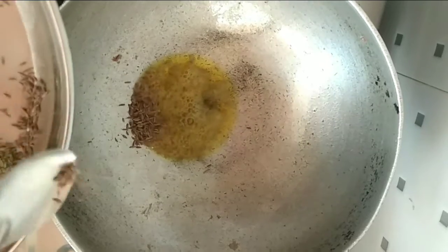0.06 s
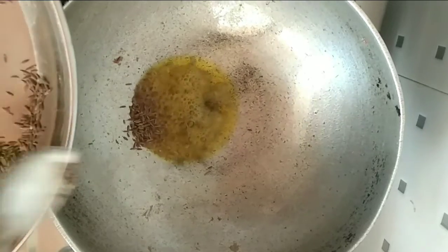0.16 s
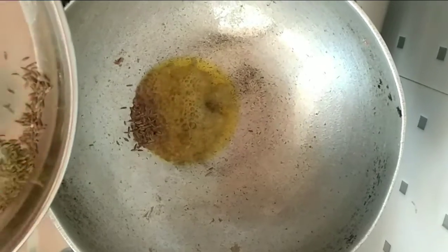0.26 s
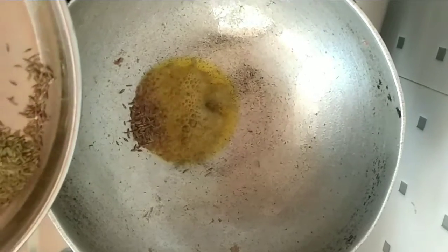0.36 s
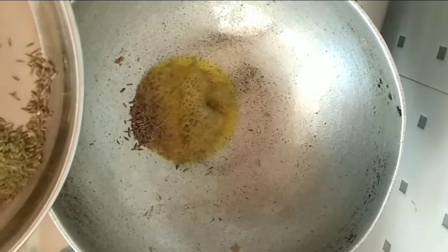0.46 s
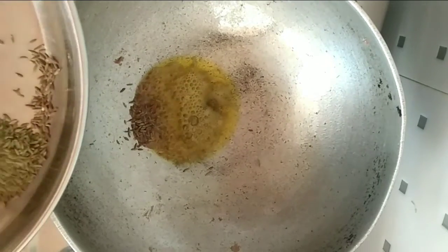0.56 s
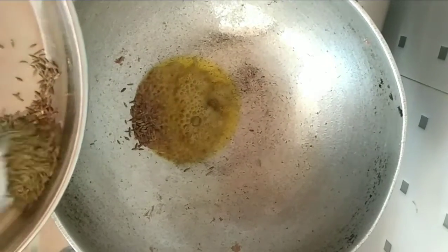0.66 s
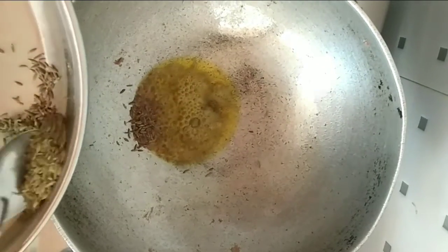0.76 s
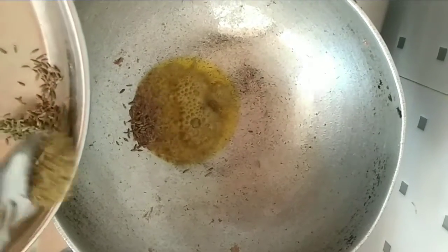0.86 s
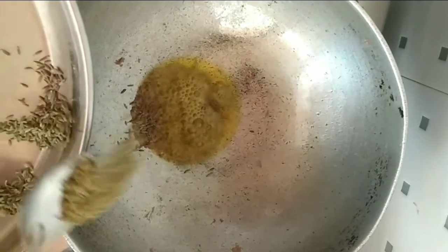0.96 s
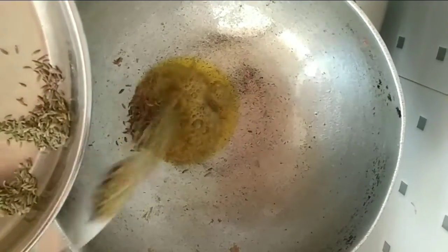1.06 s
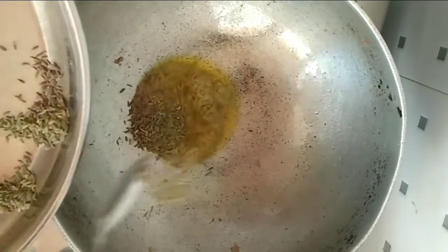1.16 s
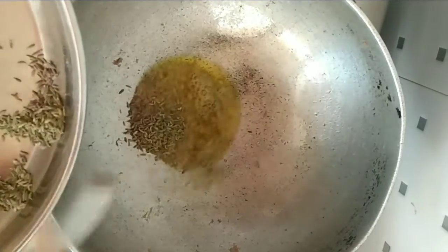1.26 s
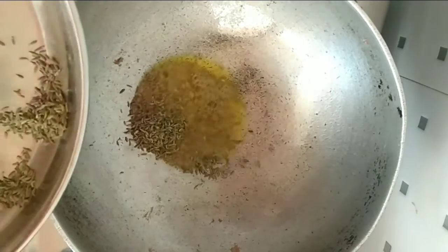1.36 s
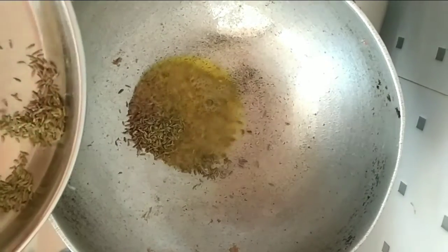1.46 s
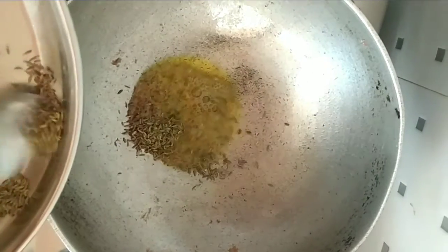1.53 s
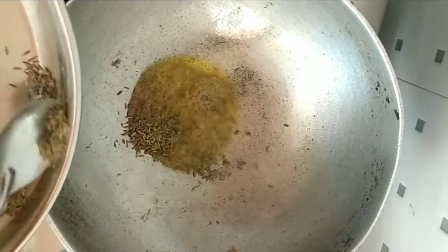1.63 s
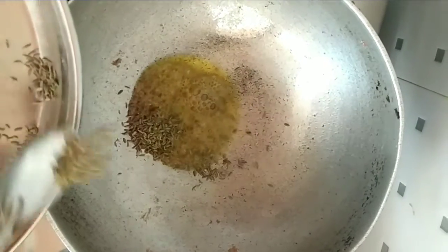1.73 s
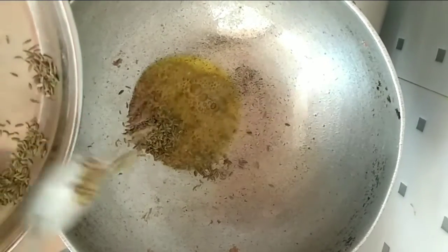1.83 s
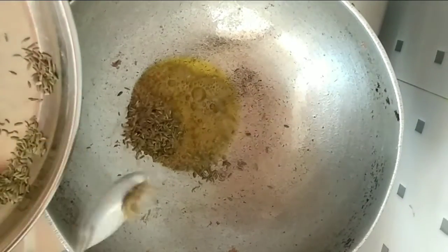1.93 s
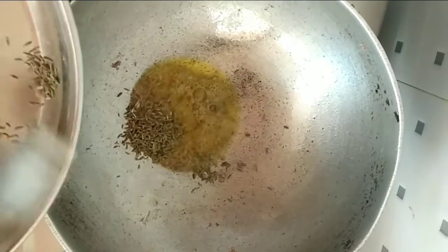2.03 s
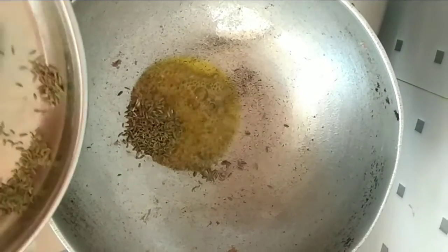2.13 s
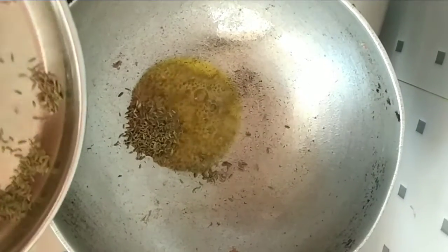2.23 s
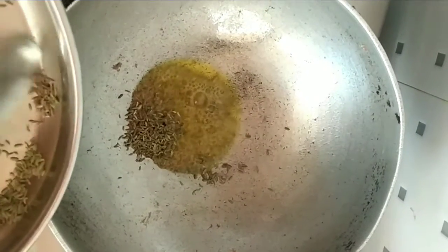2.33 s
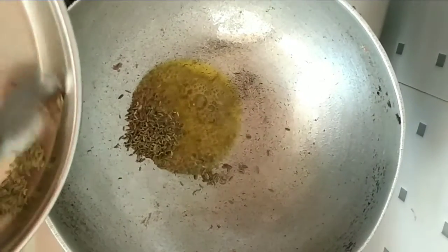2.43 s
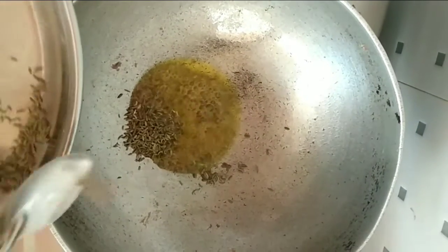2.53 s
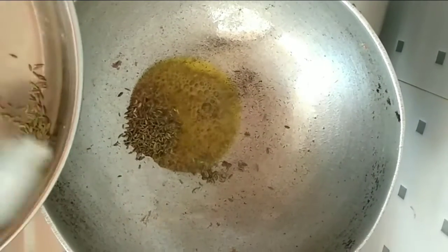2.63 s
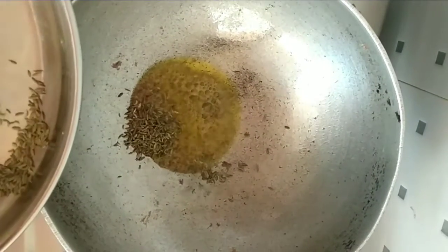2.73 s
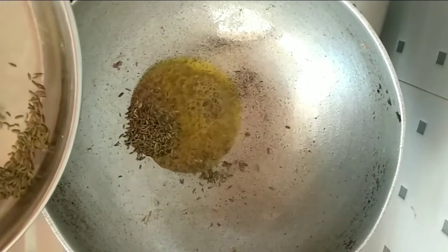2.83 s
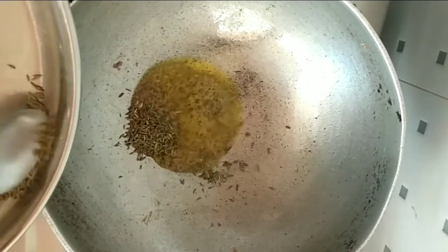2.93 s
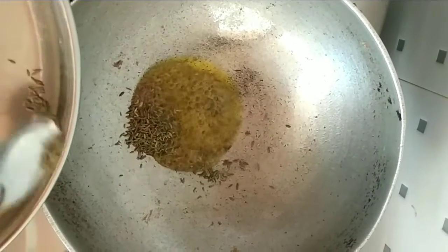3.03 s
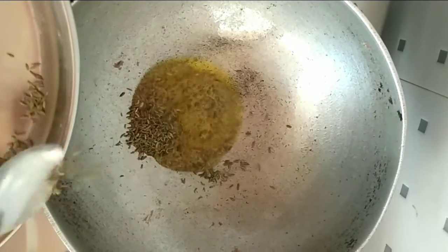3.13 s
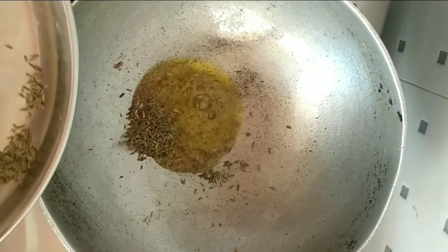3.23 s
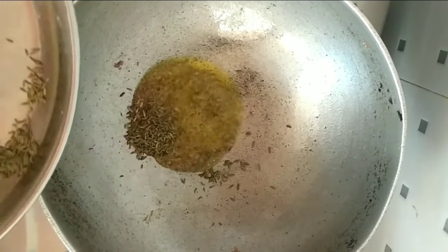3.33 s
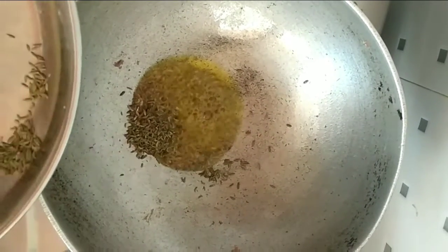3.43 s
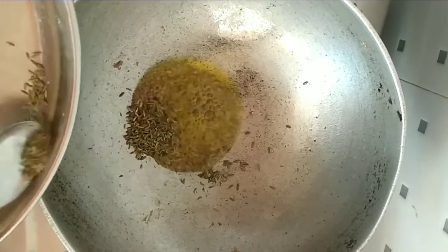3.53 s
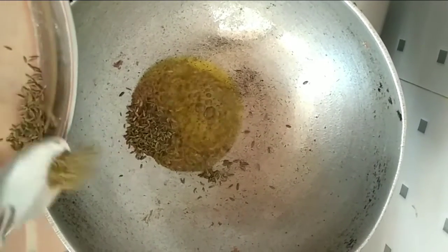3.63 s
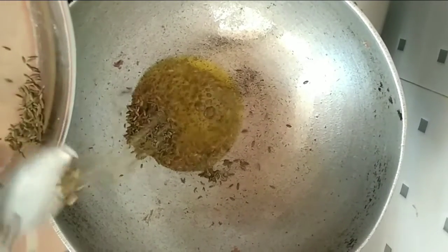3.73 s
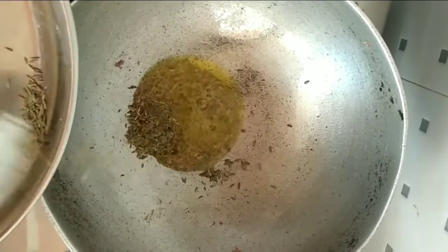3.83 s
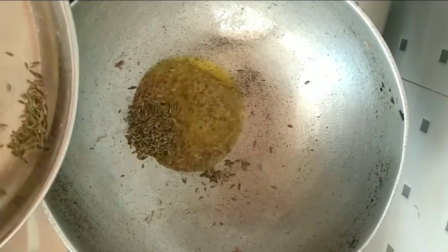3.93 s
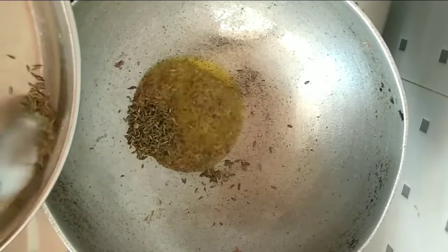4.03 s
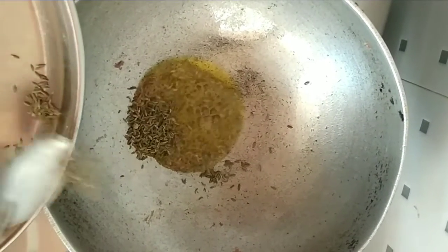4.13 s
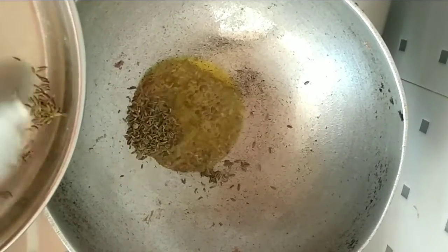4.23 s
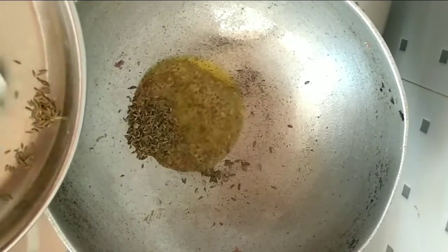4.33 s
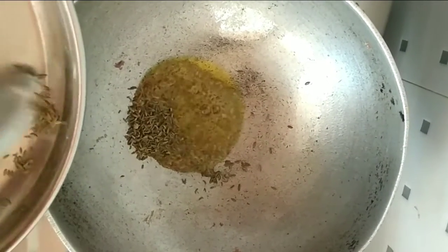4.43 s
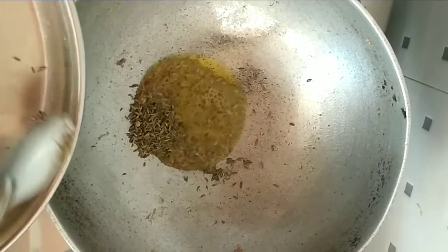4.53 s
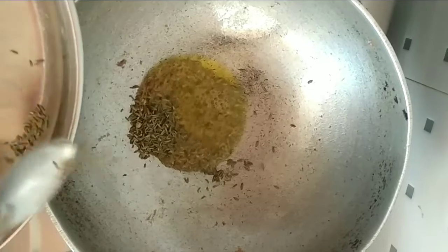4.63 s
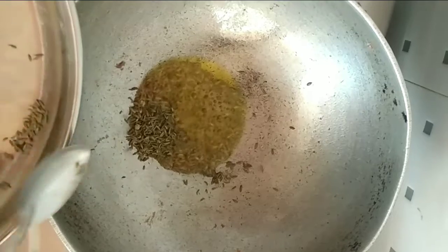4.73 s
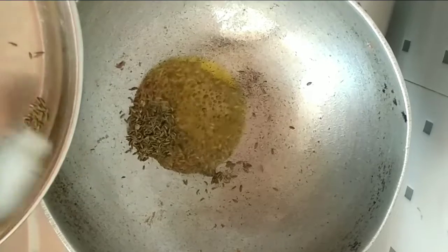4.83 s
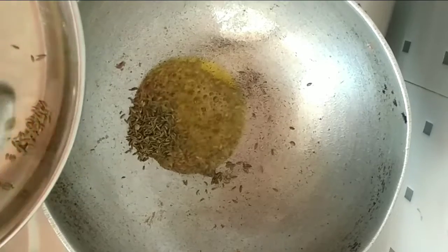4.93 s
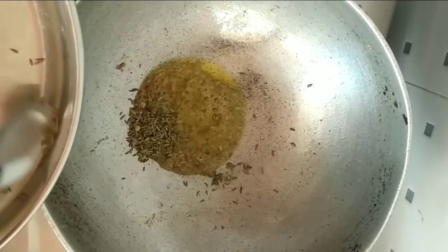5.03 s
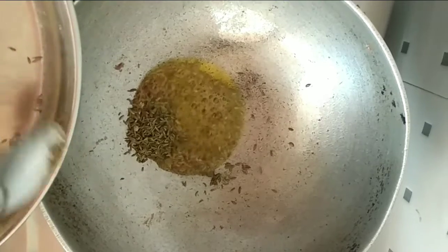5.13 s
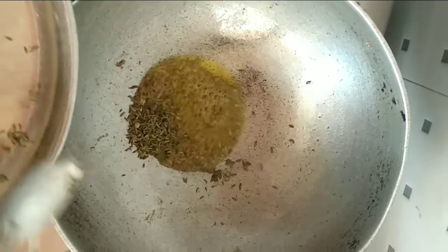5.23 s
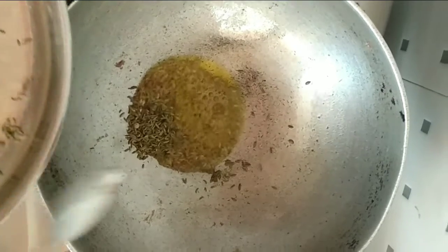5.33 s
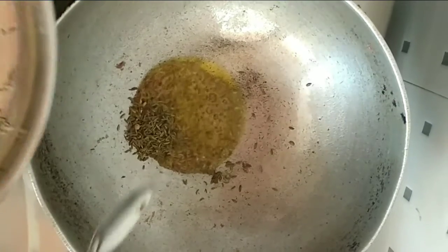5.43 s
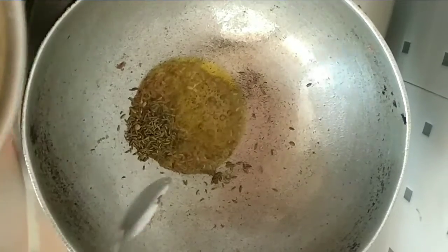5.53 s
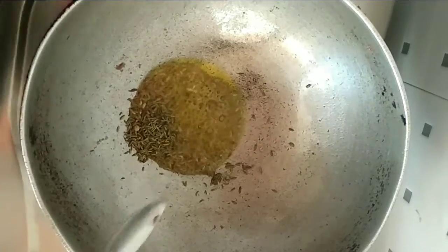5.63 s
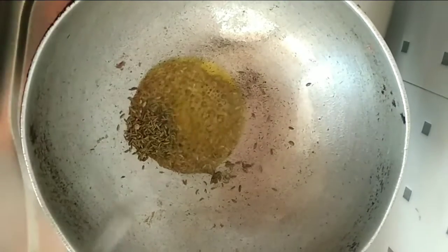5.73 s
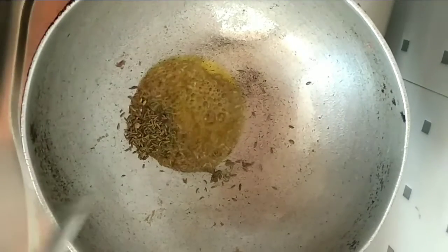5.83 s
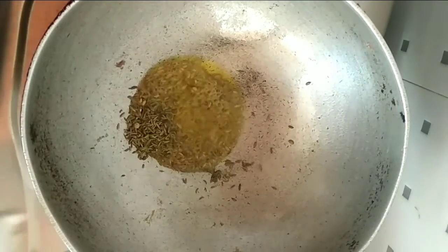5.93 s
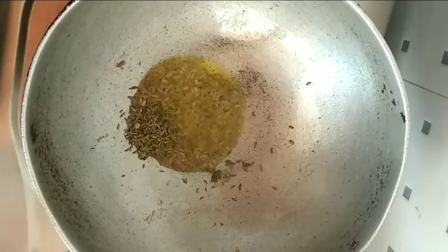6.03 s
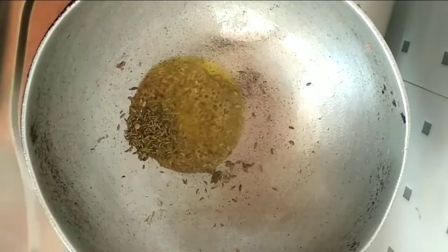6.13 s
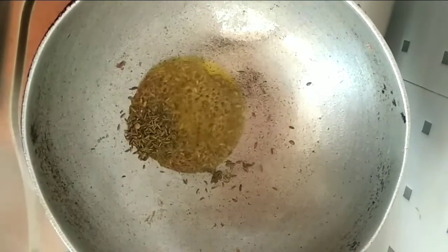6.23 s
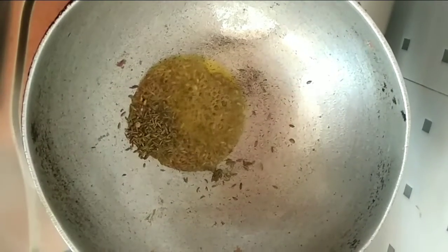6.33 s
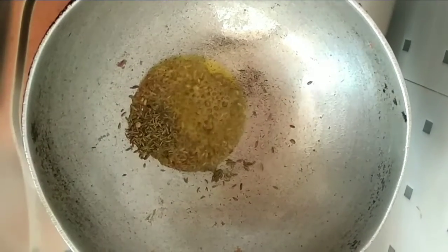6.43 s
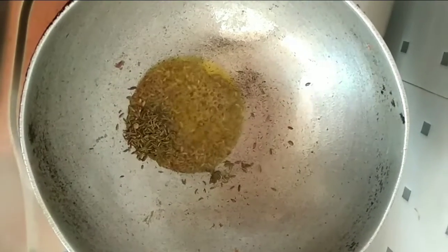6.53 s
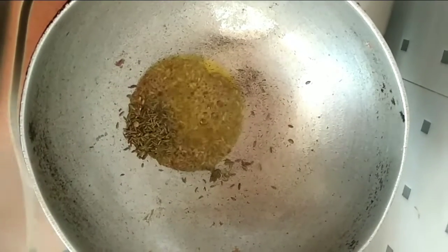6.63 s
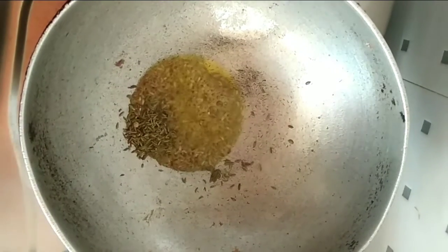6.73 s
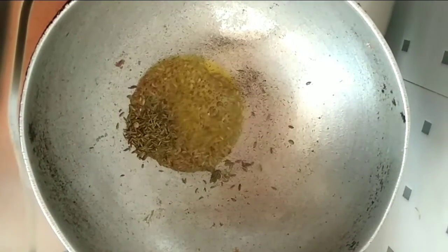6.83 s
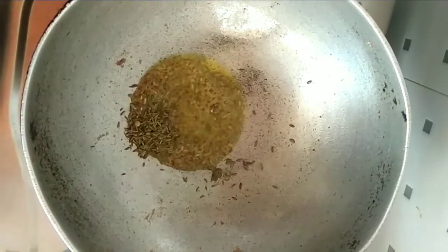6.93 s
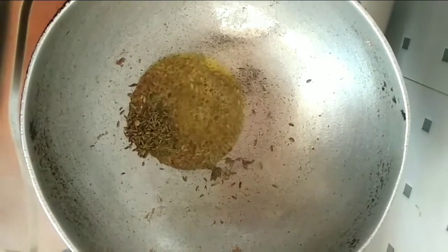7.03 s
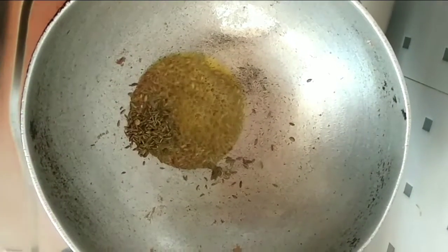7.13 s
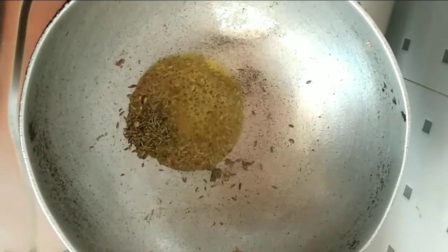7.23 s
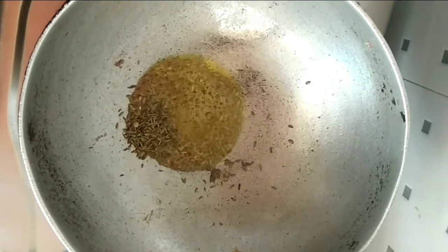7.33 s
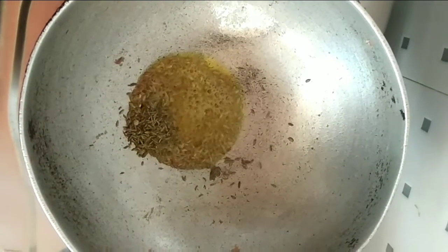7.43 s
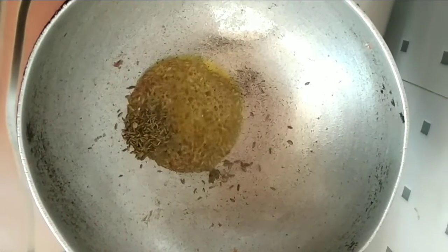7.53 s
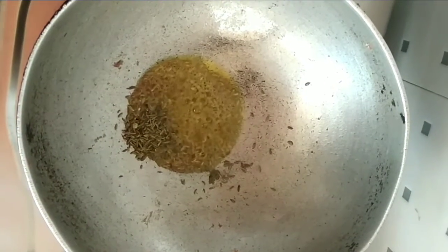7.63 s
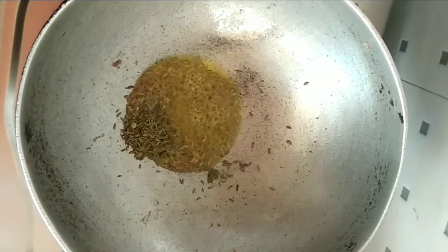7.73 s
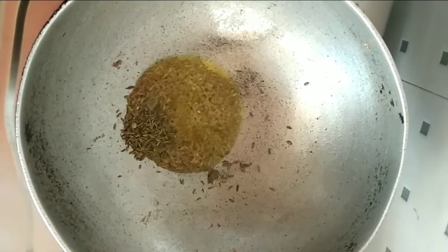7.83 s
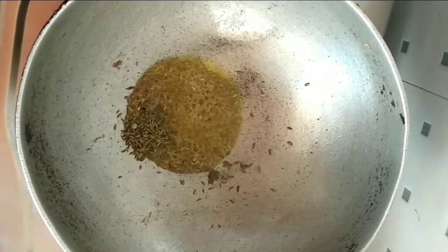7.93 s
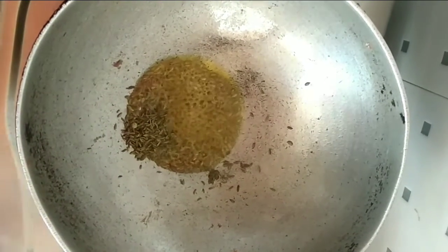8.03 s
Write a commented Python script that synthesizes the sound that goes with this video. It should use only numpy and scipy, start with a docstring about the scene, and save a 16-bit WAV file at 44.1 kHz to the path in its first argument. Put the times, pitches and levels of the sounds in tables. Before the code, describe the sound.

Close up in a small tiled kitchen, a steady fine fizz of hot oil runs throughout. A spoon clinks and rasps brightly on a steel plate, mostly to the left, and dry seeds slide and patter into a steel pan. Sparse pops turn into a dense, loud crackle from about three to six seconds, then only soft fizz and a few last scrapes remain.

```python
"""Seeds scraped into hot oil

Spoonfuls of seeds are scraped from a steel plate into a steel pan of hot oil, just below a phone.
Sliding seeds and fizz are tiny clicks and noise; each pop is a click, a short noise crack and spatter.
Scrapes and knocks of the spoon ring the modes of the plate; a kitchen hums and rings around it."""
import sys
import numpy as np
from scipy import signal
from scipy.fft import rfft, irfft, next_fast_len
from scipy.io import wavfile
from scipy.ndimage import uniform_filter1d

SR = 44100
rng = np.random.default_rng(int(sys.argv[2]) if len(sys.argv) > 2 else 0)


def generate_wav(sig):
    """Save sig (samples, or channels by samples) to the path in sys.argv[1] as 16-bit PCM at SR."""
    pcm = np.round(np.clip(np.atleast_2d(sig).T, -1, 1) * 32767).astype(np.int16)
    wavfile.write(sys.argv[1], SR, pcm)


N = 355446

# the spoon drags over the plate: (start_s, length_s, rasp_db, shoved_seeds_db,
# swell_db along the stroke, pitch_factor of the modes)
STROKES = [(0.362, 0.0086, -35.5, -44, 1, 1.0), (0.418, 0.014, -38.5, -56.5, 0.5, 0.99),
           (0.446, 0.041, -55, -49.5, -0.5, 1.0), (0.511, 0.088, -39.5, -43.5, 1.5, 1.0),
           (0.628, 0.058, -46, -52.5, 1, 1.0), (1.416, 0.11, -34, -54, 0.5, 1),
           (1.43, 0.008, -37, -44, 0, 1.0), (1.475, 0.0078, -30.5, -64, -2, 0.99),
           (1.526, 0.0077, -35, -67, 2, 1.0), (2.124, 0.1, -41.5, -55, 0.5, 0.99),
           (2.289, 0.067, -46.5, -55, -7, 1.0), (2.4, 0.028, -45, -60, 0.5, 1.0),
           (2.4205, 0.014, -29, -46, -4, 0.95), (2.733, 0.0055, -34.5, -48, -2, 0.92),
           (2.735, 0.095, -35, -48.5, 5, 0.995), (3.268, 0.112, -35, -47, -4.5, 1.0),
           (3.86, 0.12, -33.5, -57.5, 0, 1.0), (4.249, 0.13, -31.5, -66, 0.5, 1.0),
           (4.871, 0.0059, -30, -52, -1.5, 0.96), (4.872, 0.094, -32, -40.5, -2, 1),
           (4.98, 0.0683, -47, -43.5, -0.5, 0.97), (5.042, 0.0097, -37.5, -46, 1.5, 0.93),
           (6.614, 0.046, -53.5, -47, 0, 0.98), (6.742, 0.015, -44, -52.5, 0, 0.99),
           (6.943, 0.016, -36, -42, 1.5, 0.98)]


def undb(db):
    """Gain of a level in dB."""
    return 10 ** (np.asarray(db) / 20)


def level(x, db):
    """Scale to an rms level."""
    return x * undb(db) / np.sqrt(np.mean(x ** 2))


def sides(db):
    """Left and right gains that differ by db, left louder when positive."""
    return undb(np.array([[db], [-db]]) / 2)


def colour(x, table):
    """Give x the spectrum of (Hz, dB) points."""
    hz, db = np.transpose(table)
    size = next_fast_len(N)
    bins = np.arange(1, size // 2 + 2) * SR / size
    gain = undb(np.interp(np.log(bins), np.log(hz), db, -120, -120))
    return irfft(rfft(x, size) * gain, size)[..., :N]


def band(x, hz, width):
    """One resonance, gain 1 at its centre."""
    return signal.lfilter(*signal.iirpeak(min(hz, .4 * SR), hz / width, SR), x)


def highpass(x, order, hz):
    """Keep what lies above hz."""
    return signal.lfilter(*signal.butter(order, hz, "high", fs=SR), x)


def walk(rate):
    """Random levels held 1 / rate s and slewed; spread near 1."""
    k = int(SR / rate)
    held = np.repeat(rng.standard_normal(N // k + 1), k)
    return 1.3 * uniform_filter1d(uniform_filter1d(held, k), k)[:N]


def grains(rate, spread_db, hiss):
    """Tiny clicks of uneven size over a share of even hiss; rms 1."""
    size = undb(spread_db * np.minimum(rng.exponential(size=N), 4.5))
    clicks = (rng.random(N) < rate / SR) * rng.standard_normal(N) * size
    return level(level(clicks, 0) + hiss * rng.standard_normal(N), 0)


def chirps(rate, spread_db, cycles):
    """Sparse grains, each ringing a few cycles at 40 pitches and moments; rms 1."""
    clicks = grains(rate=rate, spread_db=spread_db, hiss=0)
    pitches = 1500 * 2 ** ((np.arange(40) + rng.random(40)) / 12)
    shifts = rng.integers(0, N, 40)
    rings = (band(np.roll(clicks, k), f, f / cycles) * np.sqrt(cycles) for f, k in zip(pitches, shifts))
    return level(sum(rings), 0)


def patchy(x, spread_db, rate):
    """Let each half octave swell and sink by itself."""
    centres = 500 * 2 ** np.arange(0, 5.1, .5)
    return sum(undb(spread_db * walk(rate)) * band(x, f, f / 3) for f in centres)


def pair(x, other, share):
    """Left and right that have x in common and differ by a share of another sound."""
    return (x + share * other * np.array([[1], [-1]])) / np.sqrt(1 + share ** 2)


def add(out, s, sound, pan_db):
    """Place a short sound between the two microphones."""
    i = int(s * SR)
    n = min(sound.shape[-1], N - i)
    out[:, i:i + n] += sound[..., :n] * sides(pan_db)


def peak(t, start, length, db, rise_db_s, fall_db_s, swell_db=0):
    """Gain that climbs in dB to start, holds or swells for length, then sinks."""
    along = np.clip((t - start) / max(length, .001), 0, 1)
    rise = rise_db_s * np.maximum(start - t, 0)
    fall = fall_db_s * np.maximum(t - start - length, 0)
    return undb(db + swell_db * along - rise - fall)


def stroke_gain(t, start, length, db, swell_db):
    """Loudness of one spoon stroke: it climbs and sinks at fixed speeds in dB per second."""
    return peak(t, start, length, db, 2500, 904.5, swell_db)


def coarse_time():
    """Seconds at every 32nd sample, enough for slow gains."""
    return np.arange(0, N, 32) / SR


def every_sample(gain):
    """Fill in a gain given on the coarse times."""
    return np.interp(np.arange(N) / SR, coarse_time(), gain)


def hum():
    """Low kitchen rumble, nearly alike at both microphones."""
    # spectrum of the rumble, before the overall level: (pitch_hz, relative level_db per Hz)
    rumble = [(8.8, -33), (15, -1), (24, -1), (31, -4), (50, 1.5), (60, -3), (70, -17.5), (91, -1.5),
              (154, -13), (265, -23), (350, -22), (421, -33), (600, -34), (780, -64.5), (1320, -120)]
    mid, side = colour(rng.standard_normal((2, N)), rumble)
    return level(mid + 0.2 * side * np.array([[1], [-1]]), -69) * undb(1.7 * walk(4.06))


def hums():
    """A wavering tone, a sine with narrow noise, under a smooth swell."""
    # short soft hums: (middle_s, level_db, pitch_hz, half_length_s, left_minus_right_db)
    soft_hums = [(2.886, -61, 410, 0.0233, 15), (5.583, -63, 237, 0.034, -0.5),
                 (6.902, -56, 532, 0.05, 10.5), (6.994, -66, 530, 0.035, 4), (7.001, -73, 792, 0.036, -13)]
    out = np.zeros((2, N))
    for (s, db, hz, half, pan_db), air in zip(soft_hums, rng.standard_normal((len(soft_hums), SR // 2))):
        t = np.arange(-2 * half, 2 * half, 1 / SR)
        waver = level(band(air, hz, 52.0), -10.5)[-len(t):]
        tone = np.sin(2 * np.pi * hz * t) + waver
        add(out, s + t[0], undb(db) * np.exp(-2 * (t / half) ** 2) * tone, pan_db)
    return out


def puffs():
    """One push of air against the microphones, a weaker pull after it."""
    # single puffs: (crest_s, peak_db, speed_hz that sets how short the puff is, left_minus_right_db)
    air_puffs = [(3.1663, -32.5, 133, -24.5), (3.5831, -36.5, 300, -15), (4.714, -23, 230, -5)]
    out, t = np.zeros((2, N)), np.arange(-441, 1323) / SR
    for s, db, hz, pan_db in air_puffs:
        push = np.exp(-(10.7 * hz * t) ** 2)
        pull = 0.146 * np.exp(-(2.0 * (hz * t - .45)) ** 2)
        add(out, s + t[0], undb(db) * (push - pull), pan_db)
    return out


def fizz():
    """Fine steam bubbles all over the oil, unrelated left and right."""
    # how hard the oil fizzes: (time_s, level_db)
    heat = [(0.0, -46.5), (2.5, -46), (3.4, -47), (4.2, -47.5), (5.3, -46.5), (8.06, -49)]
    # spectrum of the bubbles: (pitch_hz, relative level_db per Hz)
    bubble_spectrum = [(400, -40), (520, -21.5), (1000, -26), (1320, -17.5), (1740, -24), (2100, -11),
                       (3250, -6), (4300, -10), (7300, -2.5), (12000, -2.5), (15600, 2)]
    heat_db = np.interp(np.arange(N) / SR, *np.transpose(heat))
    both = []
    for side_db in (0.5, -0.5):
        clicks = grains(rate=3000, spread_db=2.0, hiss=1.5)
        clicks = clicks + 0.7 * chirps(rate=110, spread_db=1.4, cycles=50.0)
        both.append(level(patchy(colour(clicks, bubble_spectrum), 2.0, 55), side_db))
    return np.array(both) * undb(heat_db)


def room(x):
    """The pan bowl and tiled walls answer with a dense tail, duller than the direct sound."""
    t60_s, tail_db, thin_hz, dull_hz = 0.4, -10, 392, 7700
    t = np.arange(SR // 2) / SR
    tail = rng.standard_normal((2, len(t))) * undb(-60 * t / t60_s) * (t > .0015)
    tail = signal.lfilter(*signal.butter(1, [thin_hz, dull_hz], "band", fs=SR), tail)
    tail = tail / np.sqrt(np.sum(tail ** 2, axis=1, keepdims=True))
    return undb(tail_db) * signal.fftconvolve(x, tail, axes=1)[:, :N]


def pops():
    """A crack of about a millisecond with a duller body, then droplets spatter all over the pan."""
    # bursting seeds and spits of oil: (time_s, peak_db of the crack, centre_hz,
    # body_db and spatter_db against the crack)
    bursts = [(0.367, -27, 12000, -8.5, -15.5), (0.4208, -31, 10500, -12.5, -10.5),
              (0.741, -43, 2400, -7, -25), (0.878, -44, 11000, -34, -26), (1.2504, -23, 7100, -51, -15.5),
              (1.5139, -22, 11900, -41, -21), (1.5754, -38, 3360, -22, -21),
              (1.6137, -28.5, 11000, -31, -16), (1.6254, -27.5, 9000, -28.5, -21),
              (2.0637, -29.5, 9600, -36.5, -13), (2.125, -13, 10240, -7.5, -29),
              (2.284, -33.5, 11200, -32, -7.5), (2.3295, -36, 5000, -11.5, -23),
              (2.34, -32.5, 4430, -29, -7.5), (2.7319, -25, 12300, -7.5, -17),
              (3.1087, -7.5, 7360, -16, -20.5), (3.173, -7, 13000, -13, -24),
              (3.2372, -22.5, 13500, -29, -12), (3.2627, -11.5, 10300, -12, -22.5),
              (3.3893, -22, 9050, -22, -31), (3.462, -19, 5460, -9, -11.5), (3.559, -15, 4600, -11, -20.5),
              (3.5909, -7.5, 9800, -16.5, -15.5), (3.6495, -11, 5700, -57.5, -17.5),
              (3.8166, -9.5, 6500, -13.5, -21.5), (3.829, -26, 7000, -15, -18),
              (3.8595, -11.5, 11400, -9, -18.5), (3.9076, -32, 2780, -1, -14),
              (3.915, -25, 11500, -30.5, -15), (3.966, -27, 3000, -5, -13), (3.993, -10.5, 7250, -17, -18),
              (3.998, -17, 12000, -27, -10), (4.015, -21, 6300, -24, -12), (4.2, -29, 7600, -15, -10),
              (4.238, -22, 8700, -30, -14), (4.2513, -8, 12100, -15.5, -22.5), (4.446, -27, 11000, -4, -19),
              (4.468, -31.5, 7000, -1.5, -29), (4.561, -31, 12300, -14, -11.5),
              (4.6896, -21, 7180, -12.5, -20), (4.7214, -7.5, 10200, -14, -15),
              (4.784, -12, 6340, -12.5, -16.5), (4.7864, -8, 5950, -12, -32), (4.789, -17, 6840, -11, -33),
              (4.791, -14, 5540, -21, -36), (4.793, -9.5, 13500, -31.5, -20),
              (4.868, -14.5, 11000, -10.5, -16), (5.1789, -23, 7500, -11, -12.5),
              (5.318, -25.5, 9400, -20.5, -8.5), (5.331, -26, 6960, -24, -26),
              (5.35, -34, 11500, -19, -21.5), (5.6149, -21.5, 12200, -48, -16.5),
              (5.713, -23.5, 6900, -16.5, -12), (5.7243, -18, 6400, -21, -22),
              (5.7801, -3.5, 10470, -21, -16.5), (5.908, -10, 11800, -20.5, -18),
              (6.073, -27.5, 10300, -21.5, -16), (6.501, -24, 6300, -0.5, -25),
              (6.617, -31, 10900, -21, -9.5), (6.67, -33.5, 11700, -20.5, -8), (6.747, -32, 10900, -6, -13),
              (6.949, -41, 11500, -22, -3), (6.961, -39.5, 9000, -7, -6.5)]
    pan_db, pan_scatter_db, body_pitch_scatter = 1.5, 1.5, 0.13
    snap_db, snap_low_hz = -3, 900  # the first instant is one broad click
    spatter_body_db, spatter_t60_s = 5.5, 0.12
    echo_s, echo_db = 0.0043, -11  # back from the far wall of the pan, and again
    out, t = np.zeros((2, N)), np.arange(SR // 3) / SR
    click = highpass(1. * (np.arange(len(t)) == 8), 2, snap_low_hz)
    places = rng.standard_normal((len(bursts), 2))
    airs = rng.standard_normal((len(bursts), 4, len(t)))
    for (s, db, hz, body_db, spatter_db), place, air in zip(bursts, places, airs):
        where_db = pan_db + pan_scatter_db * place[0]
        pitch = 1 + body_pitch_scatter * place[1]  # each pop has its own body pitch
        bright = band(band(air[:2], hz, 0.63 * hz), hz, 1.33 * hz)
        bright = level(highpass(bright, 2, 1800.), 0)
        dull = band(band(air[2:], 2289.0 * pitch, 1440.0), 2207.0 * pitch, 3077.0)
        dull = level(dull + 0.29 * band(air[2:], 1150.0 * pitch, 580.0), 0)

        snap = band(click, hz, 1.3 * hz)
        crack = pair(*bright, 1.0) * (1 - np.exp(-t / 0.00013)) * np.exp(-t / 0.0008)
        body = pair(*dull, 0.55) * t * np.exp(-t / 0.00094)
        burst = undb(snap_db) * snap / np.abs(snap).max() + crack / np.abs(crack).max()
        burst = burst + undb(body_db) * body / np.abs(body).max()

        drops = undb(5.6 * uniform_filter1d(air[0, ::-1], 60))  # uneven loudness
        fade = undb(spatter_db - 60 * t / spatter_t60_s) * (1 - np.exp(-t / 0.0012))
        spatter = drops * (bright + undb(body_db + spatter_body_db) * dull) * fade
        add(out, s, undb(db) * (burst + spatter), where_db)
        for turn in (1, 2):  # echoes with left and right swapped
            add(out, s + turn * echo_s, undb(db + turn * echo_db) * burst[::-1], where_db)
    return out


def knocks():
    """A blow and its rebound ring the plate modes near their own pitch; a dying rattle keeps them shaking."""
    # the spoon bumps the plate: (time_s, blow_peak_db, rebound_db against the blow, rattle_db,
    # centre_hz, focus_db lost an octave away, rattle_t60_s)
    bumps = [(0.293, -68.5, -19, -70, 1020, 30.5, 0.26), (0.344, -58, -20, -53.5, 738, 3, 0.26),
             (0.359, -31.5, -12, -41, 696, 19, 0.17), (0.367, -38, -14, -52, 1000, 6, 0.08),
             (0.379, -37.5, -9, -52, 720, 6, 0.2), (0.431, -30, -17, -45.5, 490, 31, 0.35),
             (0.445, -40, -18, -47, 622, 32, 0.12), (0.4623, -47, -13, -47, 563, 8.5, 0.115),
             (0.475, -32, -16, -44, 690, 18, 0.12), (0.516, -50, -7, -58, 450, 16, 0.2),
             (0.584, -54, -11, -58.5, 850, 12, 0.164), (1.325, -59.5, -9.5, -60, 899, 5.5, 0.205),
             (1.345, -35, -8, -48, 397, 9, 0.18), (1.352, -42, -9, -53, 1100, 2, 0.08),
             (1.357, -38, -11, -52, 400, 24, 0.09), (1.366, -44, -5, -55, 1000, 25, 0.078),
             (1.396, -50, -9, -59, 800, 9, 0.1), (1.427, -54, -6, -64, 1050, 25, 0.08),
             (1.459, -55.5, -10, -62, 1010, 36.5, 0.156), (2.116, -30, -0.5, -41.5, 798, 10, 0.24),
             (2.717, -35.5, 2, -46.5, 661, 18, 0.28), (3.1647, -55, 8, -52.5, 170, 4.5, 0.59),
             (3.256, -24.5, -9, -44, 650, 18, 0.2), (3.2635, -26, -14, -47.5, 860, 20, 0.15),
             (3.3701, -38, -13, -55, 744, 14, 0.2), (3.591, -29, -19, -60, 1110, 7, 0.05),
             (3.851, -33, -21, -50.5, 810, 12, 0.31), (3.985, -44, -6, -51.5, 854, 32, 0.07),
             (4.198, -57, -9.5, -58, 760, -1, 0.67), (4.243, -30, -4.5, -46, 680, 9, 0.2),
             (4.4652, -43, -9, -60, 1200, 14, 0.08), (4.713, -48, 11, -49.5, 190, 9, 0.37),
             (4.777, -30, -1, -50, 600, 2, 0.07), (4.859, -32, -3.5, -45, 770, 1.5, 0.25),
             (5.695, -74, -10.5, -70, 760, 24.5, 0.98), (5.772, -31.5, -8, -52, 596, 5, 0.223),
             (6.499, -49.5, -14, -65.5, 1160, 15, 0.24), (6.718, -42, -13, -52.5, 433, 27, 0.2),
             (6.727, -52, -14, -56, 960, 26, 0.18), (6.738, -35.5, -13, -49, 510, 20, 0.15),
             (6.746, -34, -21, -52.5, 1120, 19, 0.1), (6.777, -43, -9, -56.5, 540, 14, 0.12),
             (6.797, -52, -9, -62, 1150, 28, 0.12), (6.807, -53, -4, -64, 420, 32, 0.1)]
    # ringing modes of the plate, before detuning: (pitch_hz, width_hz, relative level_db)
    plate_modes = [(162, 74, -14), (241, 120, -12), (295.5, 62, -8.5), (377.6, 63, -5.5), (459, 66, -6),
                   (519, 61, -5.5), (614, 120, -5.5), (662, 77, -7), (757, 38, -1), (871, 72, -3),
                   (974, 34, -8.5), (1102, 50, -3.5), (1222, 31, -8), (1860, 110, -3), (2380, 120, -1)]
    detune, flicker_db = 0.024, 4  # the grip shifts the modes from blow to blow and lets each come and go
    rebound_s, blow_damping, pan_db = 0.0085, 1.46, 4.5  # damping: wider modes while the spoon touches
    out, t = np.zeros((2, N)), np.arange(SR // 3) / SR
    touch = np.exp(-((t[:SR // 10] - .0004) / .0002) ** 2)
    shares = rng.standard_normal((len(bumps), len(plate_modes)))
    shakes = rng.standard_normal((len(bumps), 3, len(t)))
    shifts = rng.standard_normal((len(bumps), len(plate_modes)))
    flicker = [undb(flicker_db * walk(45)) for _ in plate_modes]
    for bump, share, shake, shift in zip(bumps, shares, shakes, shifts):
        s, blow_db, rebound_db, rattle_db, hz, focus_db, t60 = bump
        modes = [(f * (1 + detune * c), w) for (f, w, _), c in zip(plate_modes, shift)]
        gains = []
        for (f, w, db), c in zip(plate_modes, share):
            lost_db = max(focus_db, 0) * np.log2(f / hz) ** 2
            gains.append(undb(db + 1.26 * c - lost_db) / np.sqrt(w))

        lumpy = undb(25.0 * uniform_filter1d(shake[2], 110))
        fade = undb(-60 * t / max(t60, .02)) * (1 - np.exp(-t / 0.00106))
        rattle = pair(*shake[:2], 0.38) * lumpy * fade
        now = slice(int(s * SR), int(s * SR) + len(t))
        ring = sum(g * u[now] * band(band(rattle, f, w), f, 3.2 * w)
                   for (f, w), g, u in zip(modes, gains, flicker))
        ring = ring * undb(rattle_db) / np.sqrt(np.mean(ring[:, :600] ** 2))

        blow = sum(g * band(band(touch, f, blow_damping * w), f, 0.69 * f)
                   for (f, w), g in zip(modes, gains))
        blow = undb(blow_db) * blow / np.abs(blow).max()
        add(out, s, ring, pan_db)
        add(out, s, blow, pan_db)
        add(out, s + rebound_s, undb(rebound_db) * blow, pan_db)  # the spoon lands again
    return out


def rasp(stutter):
    """Each stroke rings the high modes, which flare up in turn; some shift with the place on the plate."""
    # high modes under the spoon: (pitch_hz, width_hz, relative level_db,
    # follow: share of the pitch change it follows, 0 to 1, no unit)
    high_modes = [(5160, 140, -19.5, 1), (6250, 130, -24, 0), (7245, 75, -11.5, 1), (9000, 171, -7.5, 1),
                  (10000, 120, -9.5, 0.96), (11440, 93, -3.5, 0), (11850, 220, 0, 0), (13150, 130, -1.5, 0),
                  (14200, 170, 0, 0), (14350, 100, -6.5, 0), (14700, 220, -2.5, 0)]
    out, t = np.zeros((2, N)), np.arange(N) / SR
    swings = [undb(db + 3.3 * walk(70) + 2.3 * walk(20)) for _, _, db, _ in high_modes]
    for s, length, db, _, swell_db, pitch in STROKES:
        i = slice(int((s - .04) * SR), int((s + length + .15) * SR))
        ring = 0
        for (f, w, _, follow), swing in zip(high_modes, swings):
            hz = f * pitch ** follow
            ring = ring + swing[i] * band(band(stutter[:, i], hz, w), hz, 4 * w) / np.sqrt(w)
        out[:, i] += level(ring, 0) * stroke_gain(t[i], s, length, db, swell_db)
    return out


def scrapes():
    """The spoon edge stutters over the plate: ringing high modes with a broad scratch between them."""
    grit_db, grit_hz, pan_db = -12, 8600, 8
    t = coarse_time()
    drag = sum(stroke_gain(t, s, length, db, swell_db) for s, length, db, _, swell_db, _ in STROKES)
    left, right = (grains(rate=3300, spread_db=1.52, hiss=1.0) for _ in range(2))
    stutter = pair(left, right, 0.96)
    grit = highpass(patchy(stutter[::-1], 3.0, 30), 4, grit_hz)
    scrape = rasp(stutter) + level(grit, grit_db) * every_sample(drag)
    return undb(np.array([[pan_db], [-pan_db]]) / 2) * scrape * undb(1.76 * walk(80))


def showers():
    """Seeds patter as they slide and fall, ringing the pan; the spoon shoves more of them along."""
    # heaps sliding and raining down: (crest_s, crest_db before rounding, swell_s to climb 20 dB,
    # treble_db against the rest, favoured_hz, lift_db at that pitch)
    heap_table = [(0.061, -55, 0.3, 11, 7040, 8), (0.755, -40, 0.07, -12, 2400, 9.5),
                  (0.778, -34, 0.04, -2.5, 6000, 2), (0.798, -31, 0.05, 1.5, 3500, 5),
                  (1.015, -40, 0.13, 2.5, 2100, 3), (1.186, -45, 0.14, 10.5, 7040, -3),
                  (1.578, -40, 0.18, -4, 3440, 7), (1.622, -35, 0.0851, 8, 3300, 8),
                  (1.65, -53, 0.1, -7, 2620, 6), (1.832, -42.5, 0.06, 4.5, 1404, 16),
                  (2.05, -51.5, 0.17, 8, 2400, 1), (2.345, -51, 0.05, 1, 4430, 8),
                  (2.39, -44, 0.1724, 1, 6130, 2), (2.431, -35, 0.09, -5, 7000, 3.5),
                  (2.665, -46.5, 0.02, 13.5, 6000, -6), (3.49, -37.5, 0.28, -1, 2400, 2),
                  (3.97, -39, 0.03, -4.5, 2800, 7), (4.004, -35, 0.13, 4, 6150, -1.5),
                  (4.43, -41.5, 0.43, -6, 2540, 1), (5.049, -44, 0.36, 1, 6400, 2.5)]
    # spectrum of the patter: (pitch_hz, relative level_db per Hz)
    seed_spectrum = [(410, -66.5), (700, -30), (1970, -5), (2430, -4), (4260, -7.5), (6070, -3), (8100, -6),
                     (11700, -2.5), (14800, -1.5), (16000, -28)]
    # pan modes rung by falling seeds: (pitch_hz, width_hz, relative level_db)
    pan_modes = [(2400, 126, -4), (3340, 390, -6), (4690, 190, -6.5), (6370, 209, -1.5), (6960, 320, -2.5),
                 (9000, 300, -8), (9900, 380, -3), (11600, 250, -1.5), (13730, 440, -5)]
    fall_share, crest_s = 0.506, 0.0083  # fall time as a share of the swell; rounding of each crest
    pan_ring_db, treble_hz, pan_db = -2.5, 5350, 3
    t = coarse_time()
    heaps = []
    for s, db, swell_s, *_ in heap_table:
        heap = peak(t, s, 0, db, 20 / swell_s, 20 / (swell_s * fall_share))
        heaps.append(uniform_filter1d(heap, int(crest_s / t[1])))
    shove = sum(stroke_gain(t, s, length, db, swell_db) for s, length, _, db, swell_db, _ in STROKES)

    both = []
    for _ in range(2):
        clicks = grains(rate=3000, spread_db=1.6, hiss=0.7)
        clicks = clicks + 0.8 * chirps(rate=150, spread_db=1.4, cycles=40.0)
        both.append(colour(clicks, seed_spectrum))
    patter = pair(*both, 1.0)
    ring = sum(undb(db + 4.0 * walk(30)) * band(patter, f, w) for f, w, db in pan_modes)
    seeds = level(patchy(patter, 2.8, 40), 0) + level(ring, pan_ring_db)
    seeds = level(seeds, 0) * undb(1.4 * walk(80))

    treble = highpass(seeds, 2, treble_hz)
    treble_gain = sum((undb(row[3]) - 1) * heap for row, heap in zip(heap_table, heaps))
    rain = every_sample(sum(heaps) + shove) * seeds + every_sample(treble_gain) * treble
    for (s, _, swell_s, _, hz, lift_db), heap in zip(heap_table, heaps):
        i = slice(int(max(s - 2 * swell_s, 0) * SR), int((s + 2 * swell_s) * SR))
        rain[:, i] += (undb(lift_db) - 1) * every_sample(heap)[i] * band(seeds[:, i], hz, 0.196 * hz)
    return sides(pan_db) * rain


def scene():
    """Near sources, with a dull spot in pitch, reach the left microphone a little late."""
    left_lag_samples, dip_hz, dip_width_hz, dip_share = 4, 1576, 190, 0.44
    near = showers() + scrapes() + pops() + knocks() + hums()
    near = near - dip_share * band(near, dip_hz, dip_width_hz)
    near = np.array([np.roll(near[0], left_lag_samples), near[1]])
    return near + room(near) + puffs() + fizz() + hum()


def record(dry):
    """The phone cuts the top, above 15600 Hz."""
    return signal.sosfilt(signal.ellip(10, .3, 70, 15600, fs=SR, output="sos"), dry)


dry = scene()
out = record(dry)
generate_wav(out)
```